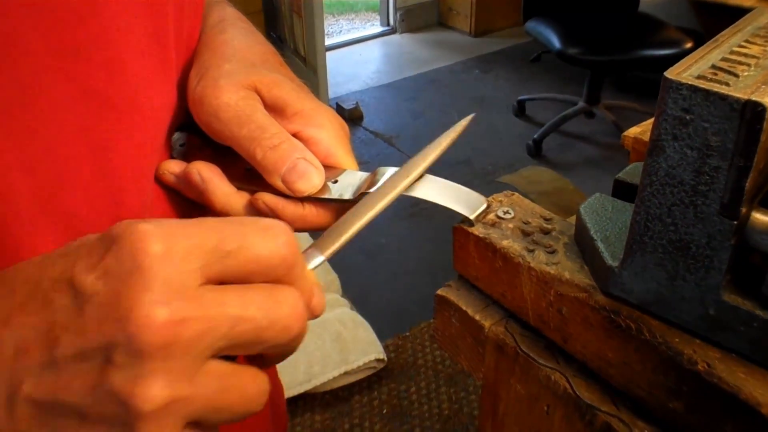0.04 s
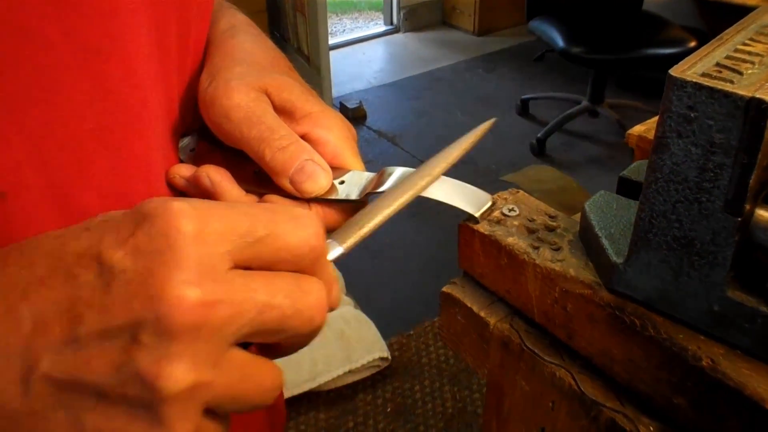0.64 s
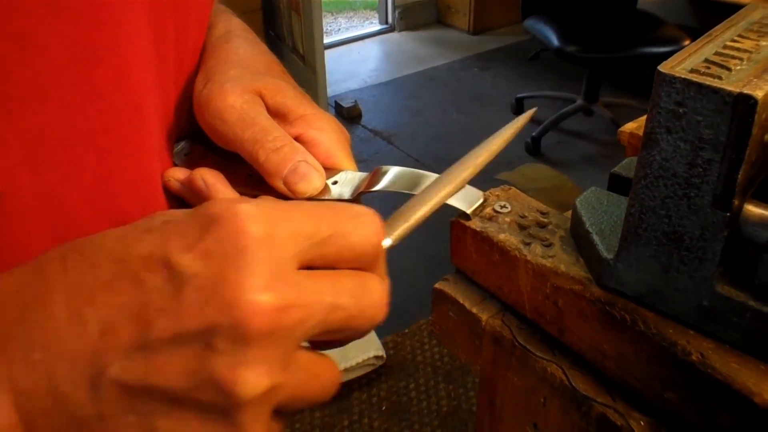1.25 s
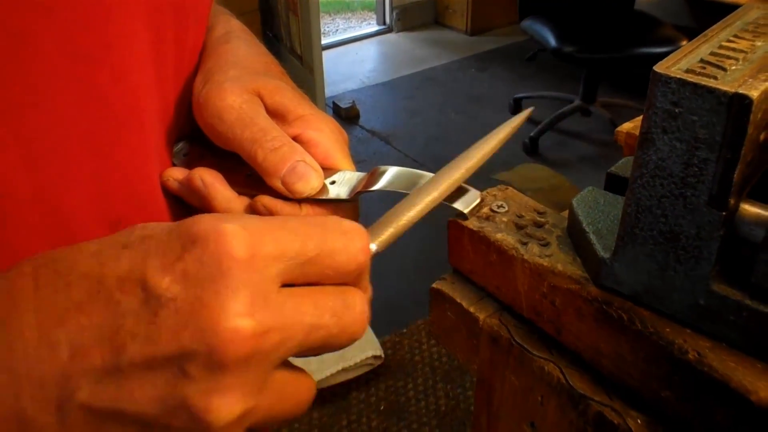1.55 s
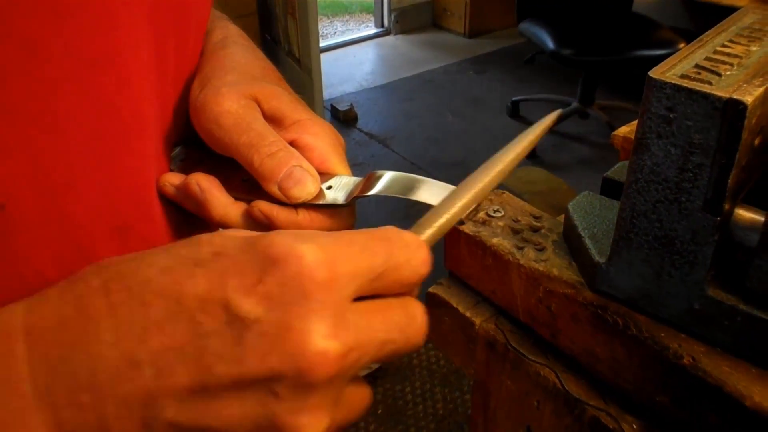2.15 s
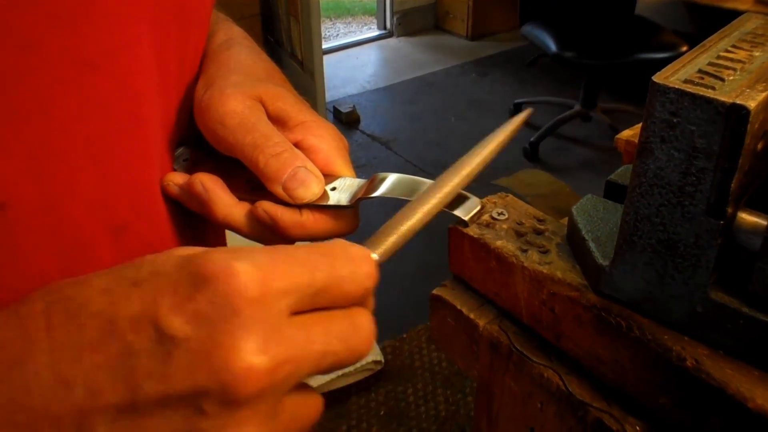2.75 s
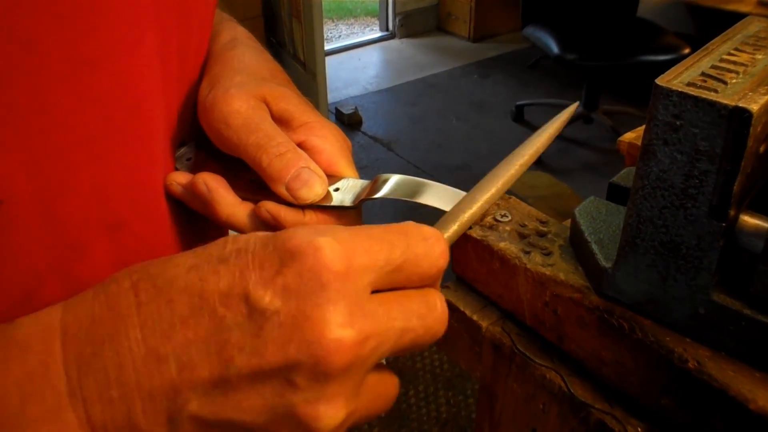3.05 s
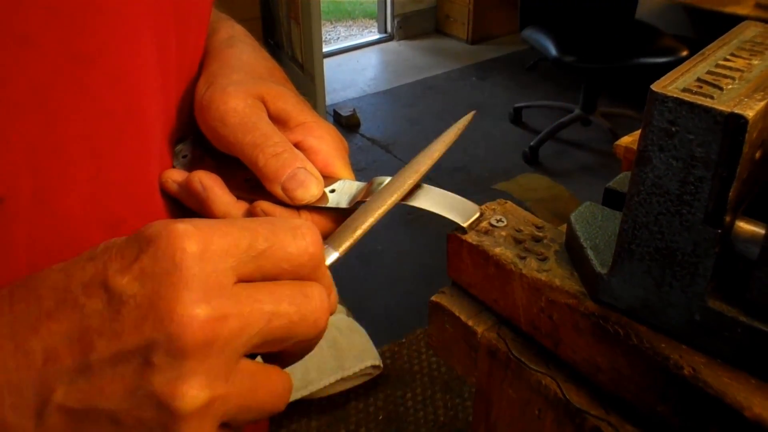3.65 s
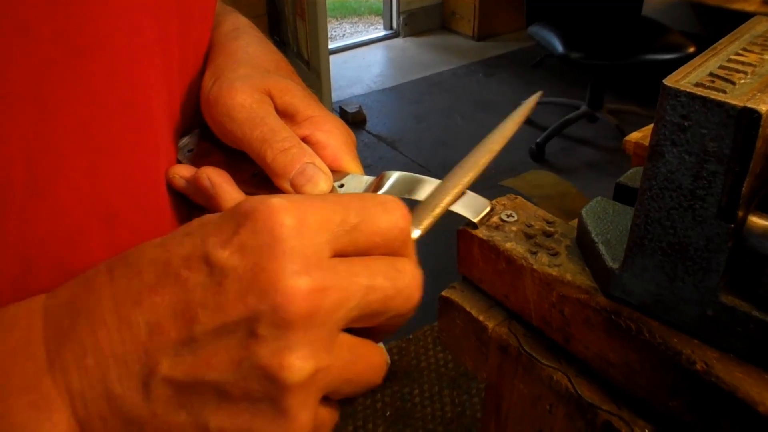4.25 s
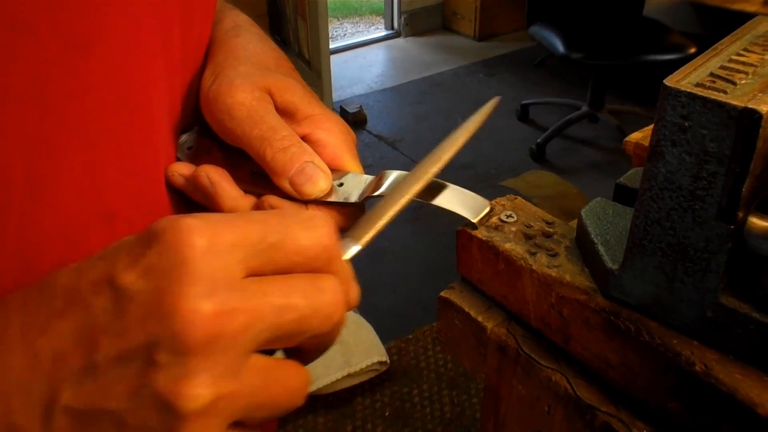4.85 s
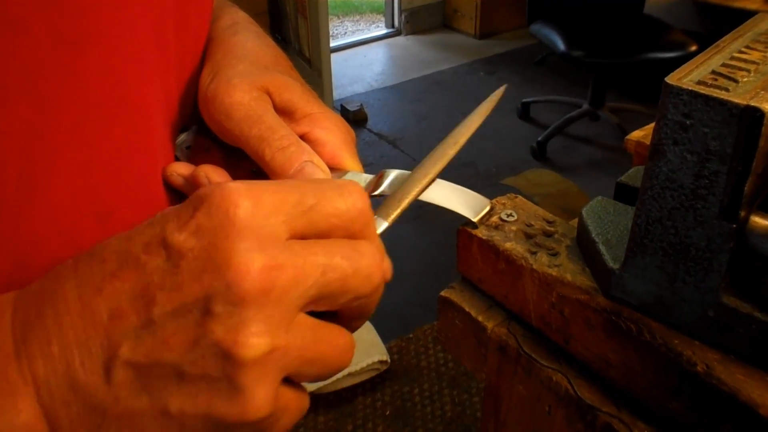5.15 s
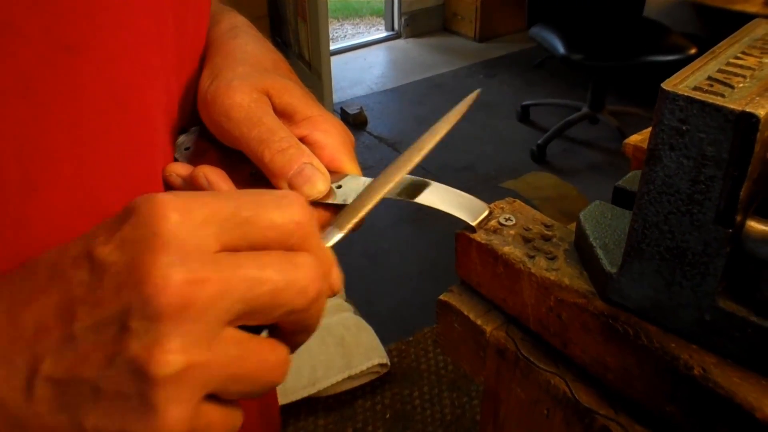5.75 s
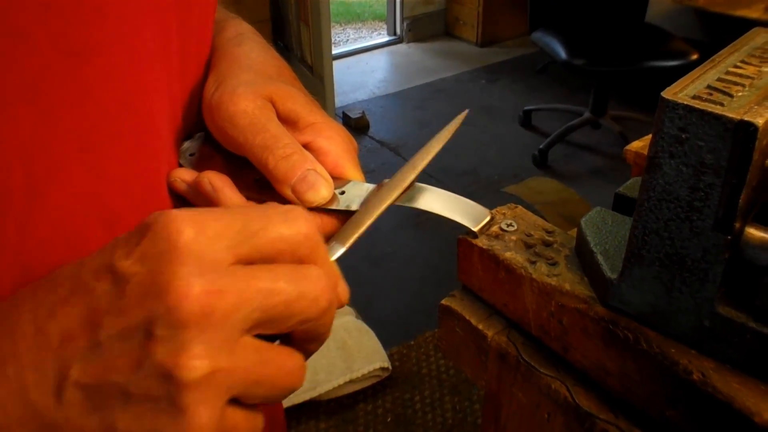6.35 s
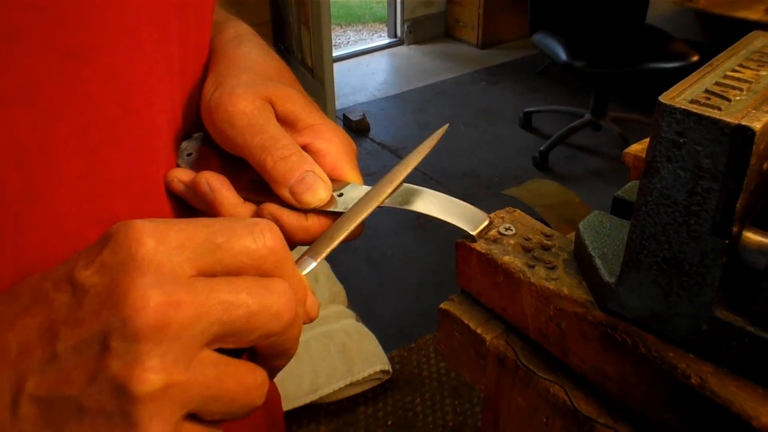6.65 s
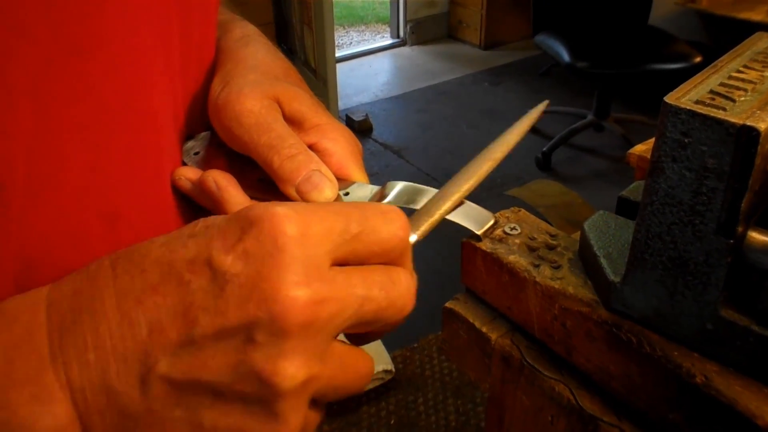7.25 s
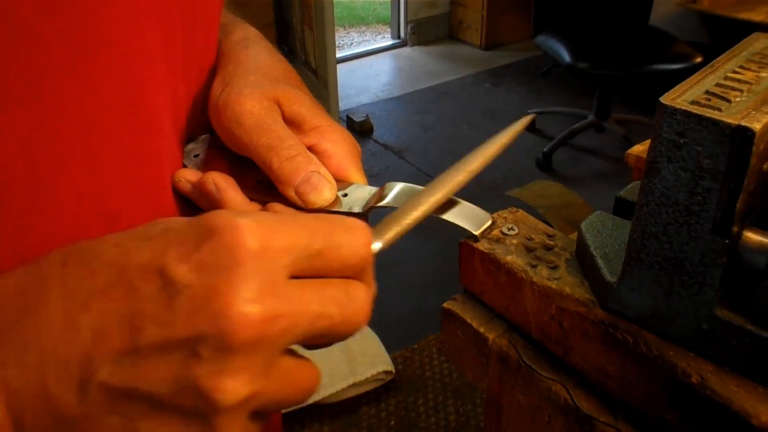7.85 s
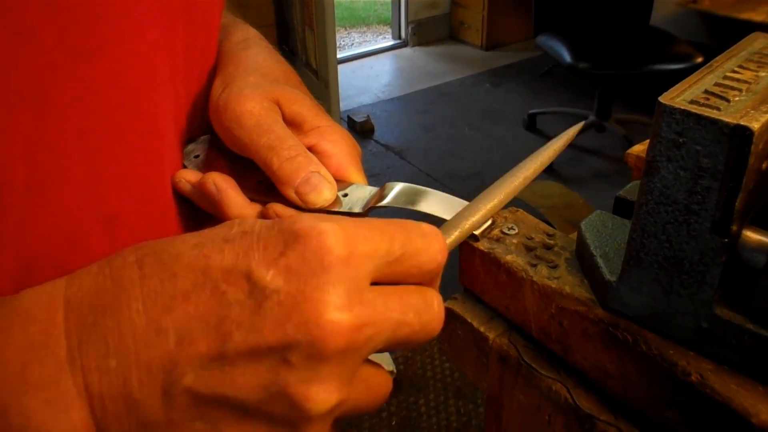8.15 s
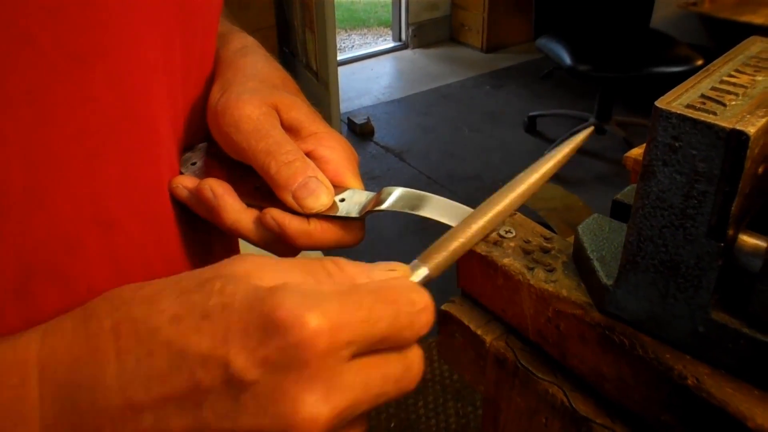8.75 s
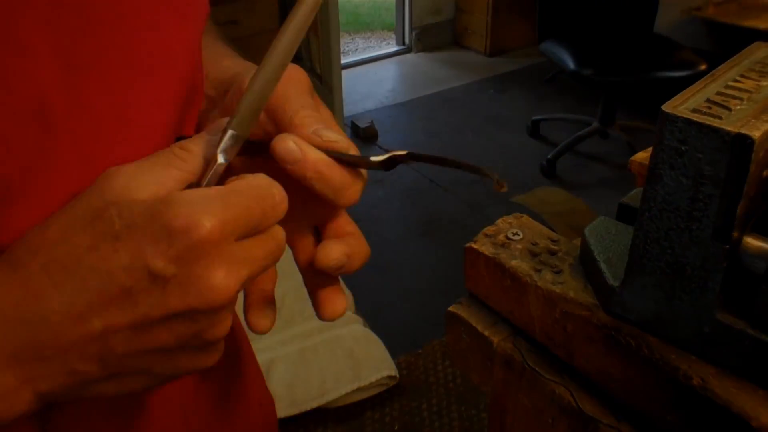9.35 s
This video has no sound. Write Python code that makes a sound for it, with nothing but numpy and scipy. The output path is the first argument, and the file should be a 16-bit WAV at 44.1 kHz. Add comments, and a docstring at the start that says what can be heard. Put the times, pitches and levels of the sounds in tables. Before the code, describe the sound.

A hand file rasps along a thin steel blade in quick, even strokes, most starting with a light metallic clack.

```python
"""Filing a steel blade

A curved blade, hand-held with its tip on a wooden bench, is sharpened with a tapered file.
Most strokes land with a clack; the teeth rasp across the edge and often graze it on the way back.
The contacts ring file, blade, edge and bench. Mains hum and soft air noise fill the small workshop."""
import sys
import numpy as np
from scipy import signal
from scipy.fft import rfft, irfft
from scipy.io import wavfile

SR = 44100
rng = np.random.default_rng(int(sys.argv[2]) if len(sys.argv) > 2 else 0)


def wav_out(sig):
    """Save sig, one row per channel (or a flat mono array), as 16-bit PCM at SR to the path in sys.argv[1]."""
    wavfile.write(sys.argv[1], SR, np.round(np.clip(np.atleast_2d(sig).T, -1, 1) * 32767).astype(np.int16))


N = 418509

# air noise shape: f/Hz, level/dB
AIR_SPECTRUM = [(25, -12.5), (110, -9), (240, -9.5), (400, -19.5), (700, -14), (1500, -17), (2500, -18),
                (4500, -18), (9000, -29.5), (12500, -41.5), (15000, -65)]
# gain of air noise and hum: t/s, level/dB
BACKGROUND_LEVEL = [(0, -57), (1.2, -57), (1.7, -61), (3.0, -58.5), (5.0, -59), (5.9, -64), (7.1, -64),
                    (8.0, -61), (9.0, -60.5), (9.49, -65.5)]
# mains harmonics: f/Hz, level/dB re air noise
HUM_PARTIALS = [(120, -19), (240, -14), (480, -14), (600, -10), (720, -11), (840, -15), (960, -16),
                (1320, -17)]
# resonances of each part: f/Hz, width/Hz, level/dB
FILE_MODES = [(2489, 91, 4.5), (2680, 39, 2.5), (2900, 190, 2.5), (3154, 136, 1), (3290, 72, 2),
              (3660, 180, -2), (4167, 290, 1)]
BLADE_MODES = [(1184.4, 49, 0), (1300, 49, -0.5), (1401, 102, 8.5), (1442, 158, 9), (1551, 130, 4),
               (1769, 25.4, -3), (2015, 260, -8.5), (2370, 51, -18)]
BENCH_MODES = [(134.3, 4.7, -2), (153, 14, -40), (190.8, 11.3, 2.5), (294, 9.3, 1), (351.7, 28, -6.5),
               (479, 35, -0.5), (530, 16, -2.5), (617, 63, -7.5), (738, 21, -0.5), (899, 39, -4.5)]
EDGE_MODES = [(4750, 298, 3.5), (5366, 285, 3.5), (5910, 370, -1), (6600, 770, -6), (7430, 350, -2),
              (8300, 370, -5), (8830, 780, -8), (10180, 5400, -16.5), (11760, 880, -14.5),
              (14300, 760, -44)]
# file hits steel: t/s, file level/dB, then re file: blade/dB, thud and chirp drive/dB, edge/dB
FILE_KNOCKS = [(0.0474, -24, 2.5, -14, -6), (0.6783, -34, 7, -11.5, 3), (0.9789, -27.5, 3, -11, -3.5),
               (1.2379, -24, 1.5, -11, 0.5), (1.7173, -31.5, 3, -5, -3.5), (2.1437, -28.5, 2, -0.5, -6),
               (2.257, -28, 7, -30, -16), (2.2669, -31, 4, -28, -5), (2.2925, -32, 8.5, -7, -4),
               (2.521, -32, 3, -2, -7), (2.623, -34, 5, -15, -16), (2.6923, -42, 14, 3, 6.5),
               (2.9229, -31.5, 2, -3, -7.5), (3.347, -30, 0.5, -6, -10), (3.774, -30.5, 1, -8.5, -10),
               (4.6157, -30, 4, -11.5, 4.5), (5.0746, -21.5, -0.5, -25, -3.5), (5.528, -32, 2.5, -13, 2.5),
               (5.9532, -27, -1, -17, -1.5), (6.346, -32.5, 3, -12, 3), (6.7342, -34, -1.5, -12, 1),
               (7.1428, -45.5, 9.5, -1.5, 2), (7.6141, -33, 2.5, -8, 0), (8.0387, -35.5, 2.5, -6.5, -3.5),
               (8.4968, -30.5, 0.5, -9.5, -7), (8.7106, -41.5, 6.5, -4, -1), (8.7793, -51.5, 12, 2, 7.5),
               (9.1784, -53.5, -16, -16, -12)]
# strokes: start/s, rise/s, fall/s, swell/dB, peak file drive/dB,
# drive re file (blade/dB, bench/dB, edge/dB), darkening over the stroke/dB
FILE_STROKES = [(0.059, 0.25, 0.13, 13.5, -27, -4.5, -13.5, -9.0, -6),
                (0.69, 0.227, 0.077, 14.5, -28, -2.5, -15, -9.5, 2),
                (1.254, 0.16, 0.082, 18.5, -29.5, -1.5, -16.5, -11.0, -0.5),
                (1.735, 0.12, 0.09, 22, -29.5, 1.5, -13.5, -11.0, 0),
                (2.16, 0.12, 0.055, 23, -27.5, 1.5, -14, -9, -6),
                (2.54, 0.1, 0.075, 22, -30, 1, -14, -9.5, -8),
                (2.941, 0.14, 0.069, 17, -27.5, 0, -17, -13.5, -2.0),
                (3.38, 0.1, 0.097, 21.5, -26.5, -2, -16.5, -12, -2.5),
                (3.81, 0.12, 0.08, 5.5, -32.5, -3.0, -11.5, -9, -3.5),
                (4.02, 0.094, 0.084, 16.0, -30, -2, -22.5, -5.5, -10.5),
                (4.234, 0.094, 0.079, 8, -29.5, -5.5, -20, -8, 5),
                (4.636, 0.11, 0.095, 9, -31, -5, -16.5, -6, 0.5),
                (5.1, 0.089, 0.14, 8, -34, -7.5, -20, -4, 0.5),
                (5.55, 0.084, 0.13, 12.5, -34, -8.5, -16.5, -5, -1.0),
                (5.97, 0.075, 0.13, 5, -39.5, -4.5, -12.5, -5, -3.5),
                (6.37, 0.087, 0.14, 15, -41, -4.0, -11.5, -5, -5.5),
                (6.76, 0.11, 0.098, 12, -41.0, -3, -11, -3.5, -1.5),
                (7.202, 0.12, 0.072, 1.5, -38.5, -2, -12.5, -7.5, -2),
                (7.635, 0.11, 0.13, 10.5, -33.5, -5.0, -14.5, -8, -2),
                (8.06, 0.12, 0.088, 17.5, -31.5, -4.5, -17, -9, -2),
                (8.515, 0.12, 0.094, 15, -30.5, -1.5, -15.5, -9.5, 0.5)]
# rows file, blade, bench, edge: swell factor, tilt over a stroke/dB, darkening factor, graze offset/dB
PART_RESPONSE = [(0.97, 2.5, -0.24, -1), (0.79, 10, 0.51, 1.5), (0.63, 11, 1.25, -14),
                 (0.94, -1.5, -1.48, -8)]
# bending tones of the file: f at tip/Hz, f at heel/Hz, width/Hz, level/dB
BENDING_MODES = [(3385, 2246, 160, -12), (5480, 3970, 185, 2.5), (7400, 6300, 130, -19),
                 (9300, 7660, 330, -12.5), (11700, 9660, 550, -17.5)]
# brushes on the return: centre t/s, width at half height/s, drive/dB
RETURN_GRAZES = [(1.012, 0.024, -39.5), (1.532, 0.025, -42), (1.917, 0.011, -35), (1.961, 0.013, -37),
                 (2.373, 0.02, -38.5), (2.766, 0.03, -31.5), (3.182, 0.038, -35.5), (3.599, 0.02, -38),
                 (4.441, 0.019, -42.5), (4.842, 0.019, -45.5), (5.332, 0.032, -52), (6.601, 0.012, -45),
                 (6.99, 0.027, -52.5), (7.42, 0.03, -38.5), (7.872, 0.039, -43), (8.311, 0.039, -35),
                 (8.756, 0.025, -37.5), (8.784, 0.026, -50)]
# side-channel filter of nearby surfaces: f/Hz, level/dB
SIDE_SPECTRUM = [(100, -43), (300, -63), (700, -9.5), (1400, -15.5), (2400, -8), (4400, -3), (8000, 3.5),
                 (15000, -7)]
# workshop decay: f/Hz, T60/s
ROOM_DECAY = [(150, 0.5), (600, 0.66), (2000, 0.39), (5000, 0.36), (12000, 0.39)]


def from_db(db):
    """Decibels to gain."""
    return 10 ** (np.asarray(db) / 20)


def unit_energy(x):
    """Scale a response to keep the power of white noise."""
    return x / np.sqrt(np.sum(x ** 2, axis=-1, keepdims=True) + 1e-20)


def at_hz(points, hz):
    """Interpolate a table over log frequency."""
    known_hz, values = np.transpose(points)
    return np.interp(np.log(np.maximum(hz, 1)), np.log(known_hz), values)


def coloured(x, spectrum):
    """Filter by a spectrum table."""
    size = x.shape[-1]
    hz = np.arange(size // 2 + 1) * SR / size
    return irfft(rfft(x) * from_db(at_hz(spectrum, hz)), size)


def band(x, low_hz, high_hz, order=2):
    """Butterworth band-pass."""
    return signal.sosfilt(signal.butter(order, [low_hz, high_hz], "band", fs=SR, output="sos"), x)


def through(x, response):
    """Convolve, cut to scene length."""
    return signal.oaconvolve(x, response)[:N]


def drift(rate_hz):
    """Random line segments, standard deviation 1."""
    knots = np.arange(N) * rate_hz / SR
    slow = np.interp(knots, np.arange(N // 8), rng.standard_normal(N // 8))
    return slow / slow.std()


def air_and_hum(side_db=-3.0):
    """Soft stereo air noise and the buzz of mains-fed fittings."""
    t = np.arange(N) / SR
    mid, side = coloured(rng.standard_normal((2, N)), AIR_SPECTRUM)
    air = (mid + from_db(side_db) * side * [[1], [-1]]) / mid.std()
    hum = sum(from_db(db) * np.sqrt(2) * np.sin(2 * np.pi * (hz * t + rng.random()))
              for hz, db in HUM_PARTIALS)
    return from_db(np.interp(t, *np.transpose(BACKGROUND_LEVEL))) * (air + hum)


def ringing(modes, low_hz, high_hz):
    """Impulse response of a part: damped modes, radiated within its own band."""
    t = np.arange(SR // 8) / SR
    rings = sum((-1) ** k * from_db(db) * width_hz * np.exp(-np.pi * width_hz * t)
                * np.cos(2 * np.pi * hz * t) for k, (hz, width_hz, db) in enumerate(modes))
    return unit_energy(band(rings, low_hz, high_hz, order=3))


def impacts(response, levels_db, settle_s):
    """Per knock, a hard touch and dying rebounds; level is the rms of the first 10 ms."""
    out, t = np.zeros(N + SR), np.arange(SR // 20) / SR
    for (start_s, *_), db in zip(FILE_KNOCKS, levels_db):
        force = rng.standard_normal(len(t)) * np.exp(-t / settle_s)
        force[0] += 6.8  # first touch
        hit = signal.fftconvolve(force, response)
        at = round(start_s * SR)
        out[at:at + len(hit)] += from_db(db) * hit / np.sqrt(np.mean(hit[:SR // 100] ** 2))
    return out[:N]


def blade_chirp(start_hz=1350, sweep_s=0.02237, decay_s=0.013):
    """Low bending waves run slower, so a knock on the thin blade chirps downward."""
    t = np.arange(SR // 20) / SR
    hz = start_hz / (1 + t / sweep_s) ** 2
    return unit_energy(np.sin(2 * np.pi * np.cumsum(hz) / SR) * np.exp(-t / decay_s) * (1 - t / t[-1]))


def knocking(file, blade, bench, edge, chirp_db=-3.5, judder_db=-7.5, thud_db=-6.5):
    """A knock rings the steel, makes the loosely held blade chirp and judder, and nudges the bench."""
    _, hit_db, *offsets_db = np.transpose(FILE_KNOCKS)
    blade_db, low_db, edge_db = hit_db + np.array(offsets_db)
    judder = band(signal.unit_impulse(SR // 100), 954, 2440)
    out = impacts(file, hit_db, settle_s=0.00082)
    out += impacts(blade, blade_db, settle_s=0.0012)
    out += impacts(edge, edge_db, settle_s=0.0031)
    out += impacts(blade_chirp(), low_db + chirp_db, settle_s=0.000079)
    out += impacts(judder, blade_db + judder_db, settle_s=0.031)
    return out + impacts(bench, low_db + thud_db, settle_s=0.0033)


def stroke_drive(fall_db=26, contact_s=0.0098):
    """Drive of the four parts: each stroke swells and eases off while their balance tilts."""
    t, drive = np.arange(N) / SR, np.zeros((4, N))
    swell_factor, lean_db, darken_factor, _ = np.transpose(PART_RESPONSE)[:, :, None]
    for start_s, rise_s, fall_s, swell_db, file_db, *offsets_db, darken_db in FILE_STROKES:
        on = (t > start_s - contact_s) & (t < start_s + rise_s + fall_s + contact_s)
        past_peak_s = t[on] - start_s - rise_s
        sag_db = swell_db * np.maximum(-past_peak_s / rise_s, 0) ** 1.62
        sag_db += fall_db * np.maximum(past_peak_s / fall_s, 0) ** 1.93
        tilt_db = (lean_db + darken_factor * darken_db) * past_peak_s / (rise_s + fall_s)
        contact = np.clip(np.minimum(past_peak_s + rise_s, fall_s - past_peak_s) / contact_s + 1, 0, 1)
        peak_db = file_db + np.array([0, *offsets_db])[:, None]
        drive[:, on] += contact * from_db(peak_db - swell_factor * sag_db + tilt_db)
    return drive


def contact_place(spread=0.11, pulled_stroke=9):
    """Contact along the file, 0 tip to 1 heel plus a random offset; one stroke runs in reverse."""
    times_s, places = [], []
    for k, (start_s, rise_s, fall_s, *_) in enumerate(FILE_STROKES):
        offset = spread * rng.standard_normal()
        times_s += [start_s, start_s + rise_s + fall_s]
        places += [offset + 1, offset] if k == pulled_stroke else [offset, offset + 1]
    return np.interp(np.arange(N) / SR, np.maximum.accumulate(times_s), places)


def tooth_force(catches_per_s=9000, noise_gain=0.45, chatter_db=1.33, chatter_hz=260):
    """Teeth catch and let go, in clumps as the file chatters; rms 1."""
    catches = rng.choice([-1, 1], N) * (rng.random(N) < catches_per_s / SR)
    force = catches / catches.std() + noise_gain * rng.standard_normal(N)
    force *= from_db(chatter_db * drift(chatter_hz))
    return force / force.std()


def bending_tones(force, place):
    """Resonances that glide with the file's free length, lowest first."""
    tones = []
    for tip_hz, heel_hz, width_hz, db in BENDING_MODES:
        hz = tip_hz * (heel_hz / tip_hz) ** place
        carrier = np.exp(2j * np.pi * np.cumsum(hz) / SR)
        pole = np.exp(-2 * np.pi * width_hz / SR)
        baseband = signal.lfilter([1], [1, -2 * pole, pole * pole], force / carrier)
        tone = (baseband * carrier).real
        tones.append(from_db(db) * tone / tone.std())
    return tones


def rasping(file, blade, bench, edge, blade_db=-2.0, bench_db=5.0, edge_db=-0.5, sheen_db=-13.0,
            tremor_db=1.0):
    """Teeth drive all four parts under an unsteady hand; light pressure lets the file sing freely."""
    drive = (stroke_drive() + graze_drive()) * from_db(tremor_db * drift(rate_hz=50))
    on_file, on_blade, on_bench, on_edge = drive
    place = contact_place()
    force = tooth_force()
    free = 0.9 * on_edge / (on_edge + on_blade + 1e-9)
    held_force = force * np.sqrt(1 - free)
    lowest, *upper = bending_tones(force, place)
    out = on_file * np.sqrt(free) * lowest + on_edge * free * sum(upper)
    out += through(held_force * on_file, file)
    out += from_db(edge_db) * through(held_force * on_edge, edge)
    out += from_db(blade_db) * through(force * on_blade, blade)
    # light strokes: only the tooth tips skim the steel
    sheen = band(force, 9070, 13000, order=4)
    out += from_db(sheen_db) * on_edge * free ** 2 * sheen / sheen.std()
    # firm pressure couples blade to bench; a light hold passes only the lows
    lows = signal.sosfilt(signal.butter(2, 380, fs=SR, output="sos"), force)
    firm = np.clip(1.5 - 2.57 * free, 0.05, 1.1)
    bench_force = firm * force + (1 - firm) * lows
    return out + from_db(bench_db) * through(bench_force * on_bench, bench)


def graze_drive():
    """Drive of the four parts as the returning file brushes the edge: short bell curves."""
    t, drive = np.arange(N) / SR, np.zeros(N)
    for centre_s, width_s, db in RETURN_GRAZES:
        on = np.abs(t - centre_s) < 2 * width_s
        drive[on] += from_db(db) * 0.5 ** ((2 * (t[on] - centre_s) / width_s) ** 2)
    return from_db(np.array(PART_RESPONSE)[:, -1:]) * drive


def scatter(delay_s=0.0007, decay_s=0.002):
    """Impulse response of small nearby surfaces: slightly late, stronger in the treble."""
    t = np.arange(SR // 40) / SR
    first_half = t < t[-1] / 2
    window = (t > delay_s) & first_half
    echoes = rng.standard_normal(len(t)) * np.exp(-t / decay_s) * window
    for _ in range(3):  # flatten the fine spectrum
        echoes = irfft(np.exp(1j * np.angle(rfft(echoes))), len(t)) * window
    return coloured(echoes, SIDE_SPECTRUM) * first_half


def near_surfaces(x, turn_rad=0.97, hand_rate_hz=4):
    """Direct sound plus left-right scatter off hands, vice and bench, shifting as the hands move."""
    angle = turn_rad * drift(hand_rate_hz)
    side = np.cos(angle) * through(x, scatter()) + np.sin(angle) * through(x, scatter())
    return np.array([x + side, x - side])


def off_axis(x, beam_hz=1500, width_hz=200, beamed_share=0.32):
    """The blade's flat face beams its strongest tone, so less of it spreads into the room."""
    beamed = signal.lfilter(*signal.iirpeak(beam_hz, beam_hz / width_hz, fs=SR), x)
    return x - beamed_share * beamed


def workshop_reverb(x, wet_db=-11.5, delay_s=0.0019, tilt_db_per_decade=-2.5):
    """Diffuse stereo tail that dies sooner in the treble."""
    t, edges_hz = np.arange(SR * 3 // 4) / SR, np.geomspace(80, 16000, 9)
    noise = rng.standard_normal((3, len(t)))
    left_right = noise[:2] + noise[2]  # half correlated
    tail = 0
    for low_hz, high_hz in zip(edges_hz, edges_hz[1:]):
        hz = np.sqrt(low_hz * high_hz)
        level_db = -60 * t / at_hz(ROOM_DECAY, hz) + tilt_db_per_decade * np.log10(hz / 1000)
        tail += band(left_right, low_hz, high_hz) * from_db(level_db)
    tail = unit_energy(tail * np.clip(t / delay_s - 1, 0, 1))
    return from_db(wet_db) * np.array([through(x, channel) for channel in tail])


def scene(pan_db=0.76):
    """Filing close by and slightly right, over air noise and hum."""
    file = ringing(FILE_MODES, 2170, 4670)
    blade = ringing(BLADE_MODES, 1200, 4000)
    bench = ringing(BENCH_MODES, 140, 1100)
    edge = ringing(EDGE_MODES, 4850, 12370)
    filing = rasping(file, blade, bench, edge) + knocking(file, blade, bench, edge)
    in_room = near_surfaces(filing) + workshop_reverb(off_axis(filing))
    return in_room * from_db([[-pan_db], [pan_db]]) + air_and_hum()


def record(dry, cutoff_hz=15400):
    """Steep elliptic low-pass."""
    return signal.sosfilt(signal.ellip(8, 0.1, 80, cutoff_hz, fs=SR, output="sos"), dry)


dry = scene()
out = record(dry)
wav_out(out)
```